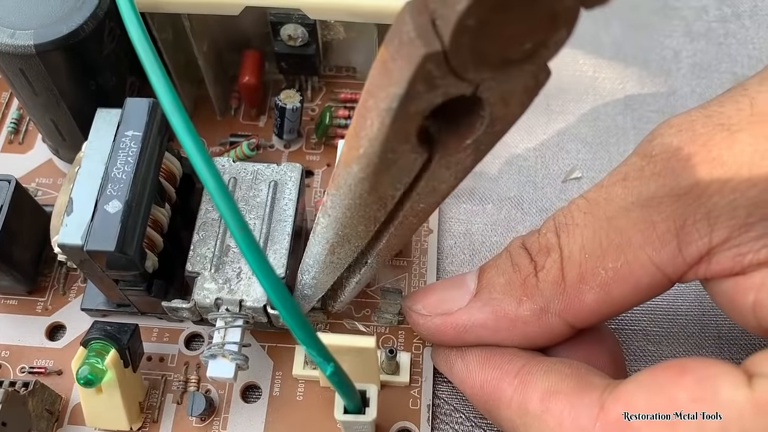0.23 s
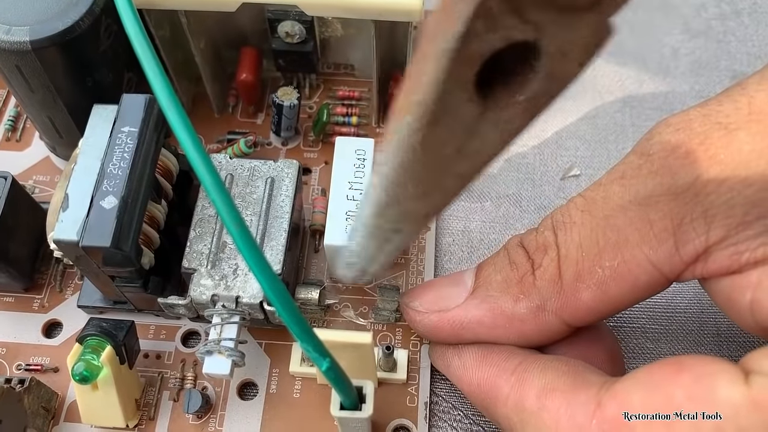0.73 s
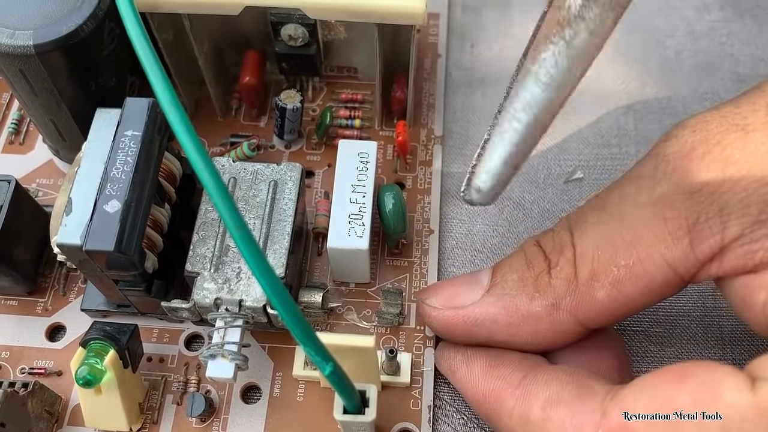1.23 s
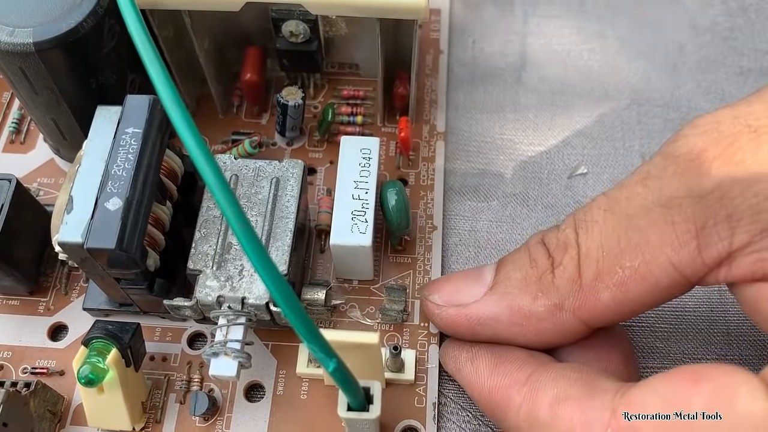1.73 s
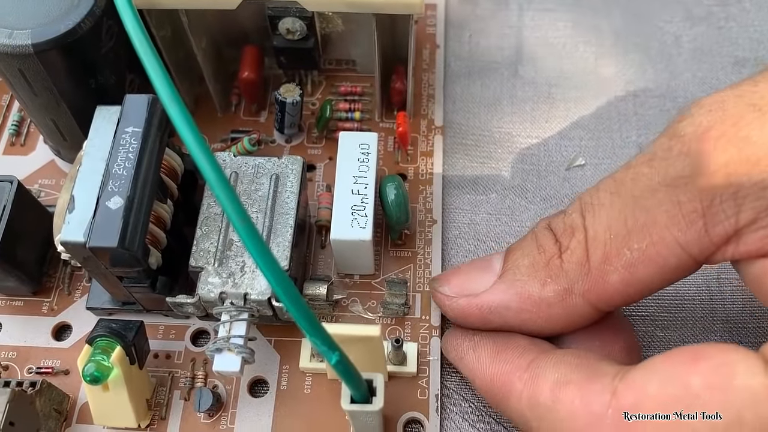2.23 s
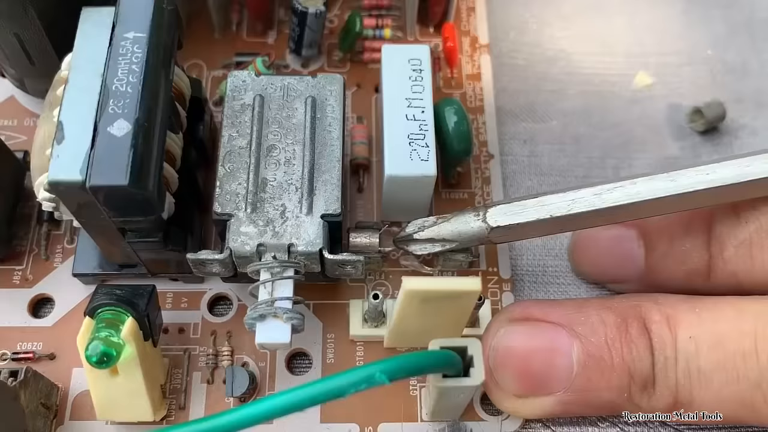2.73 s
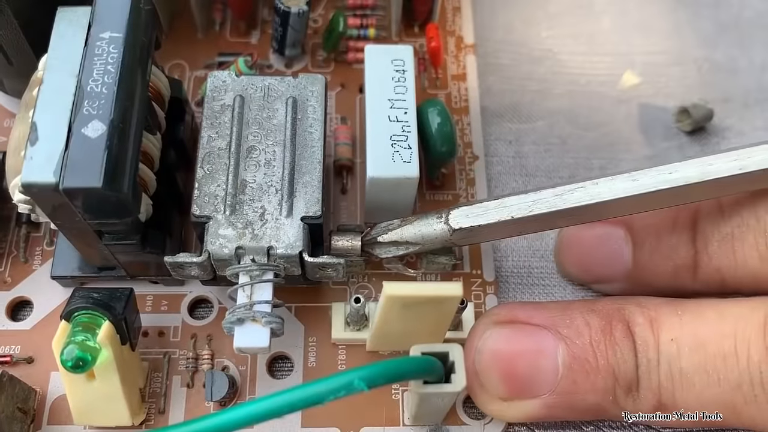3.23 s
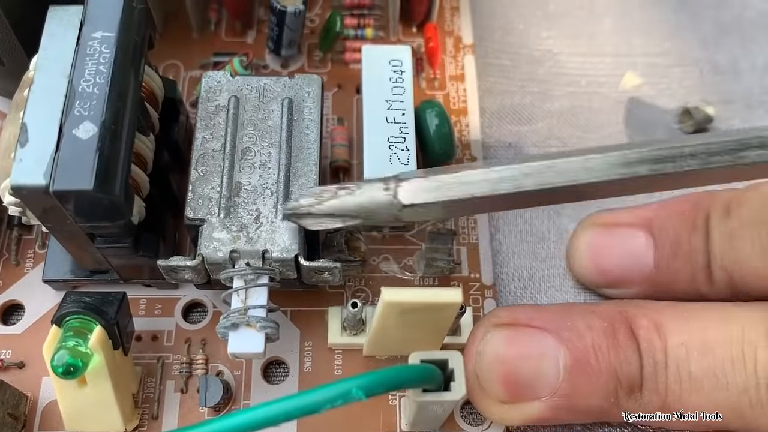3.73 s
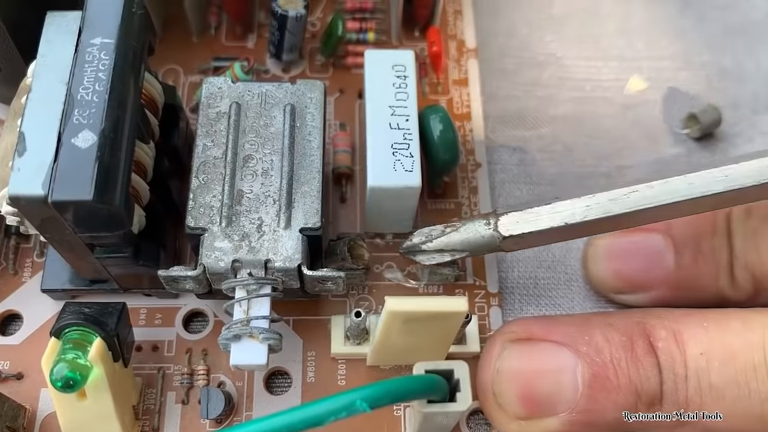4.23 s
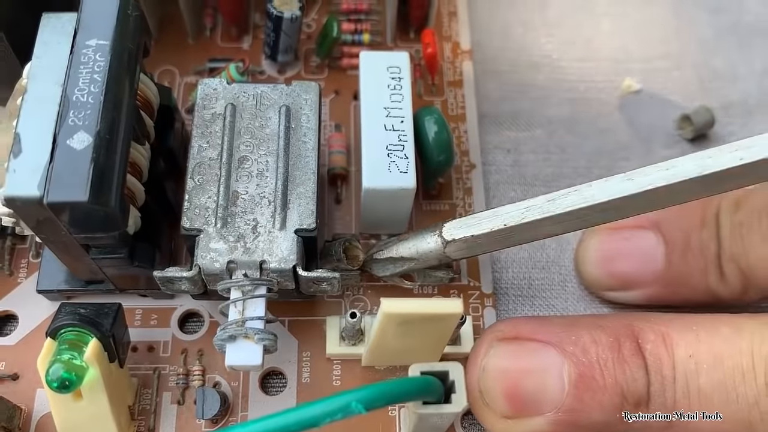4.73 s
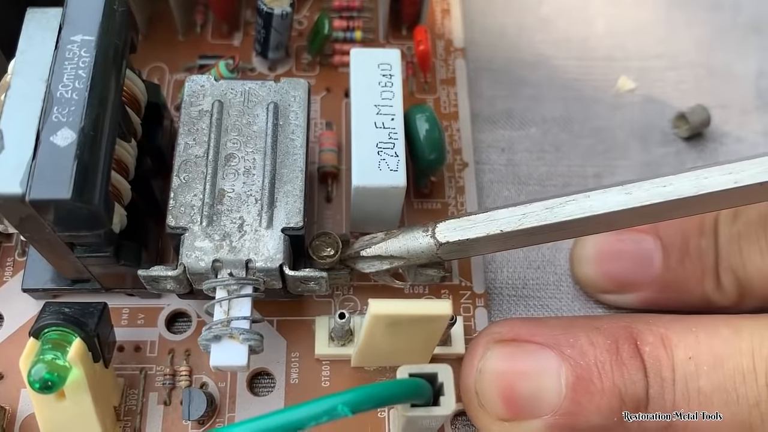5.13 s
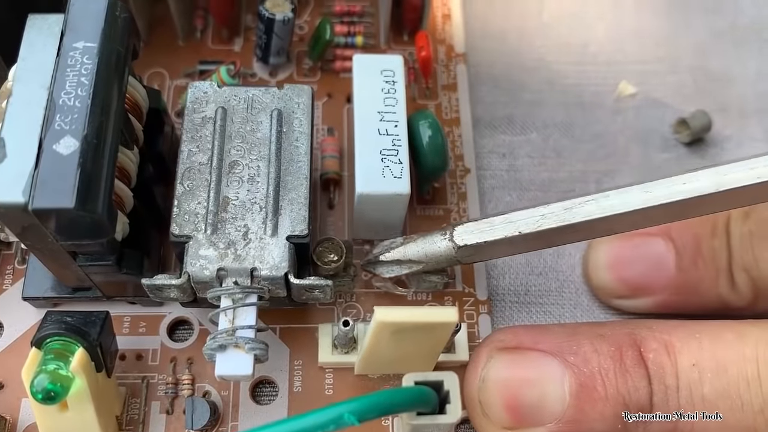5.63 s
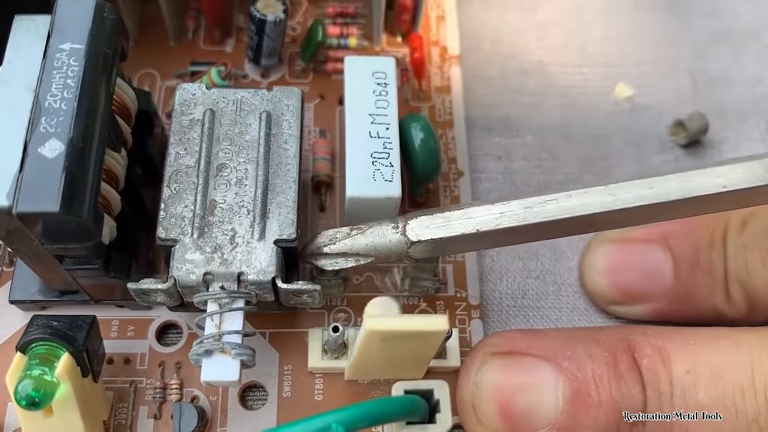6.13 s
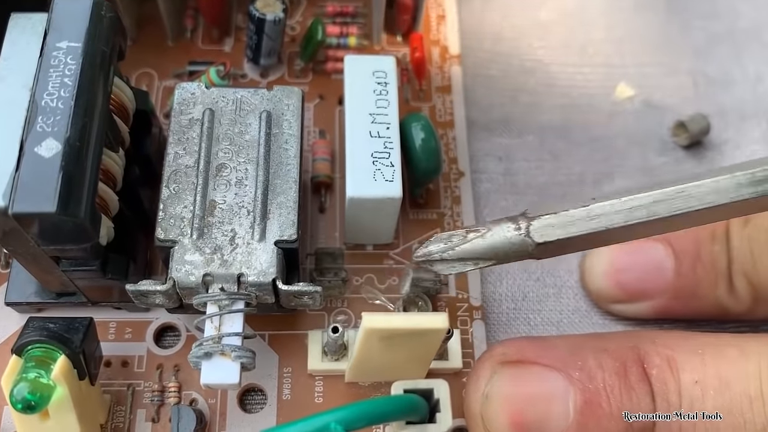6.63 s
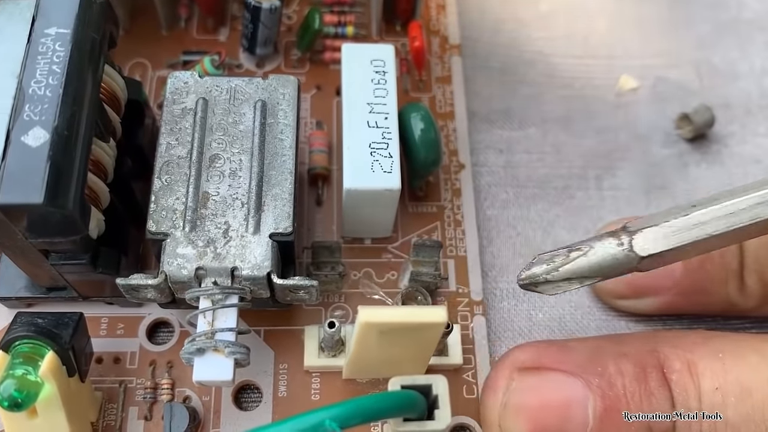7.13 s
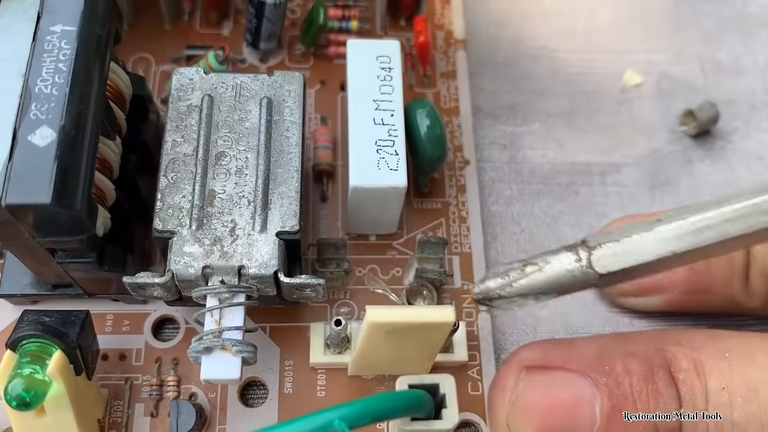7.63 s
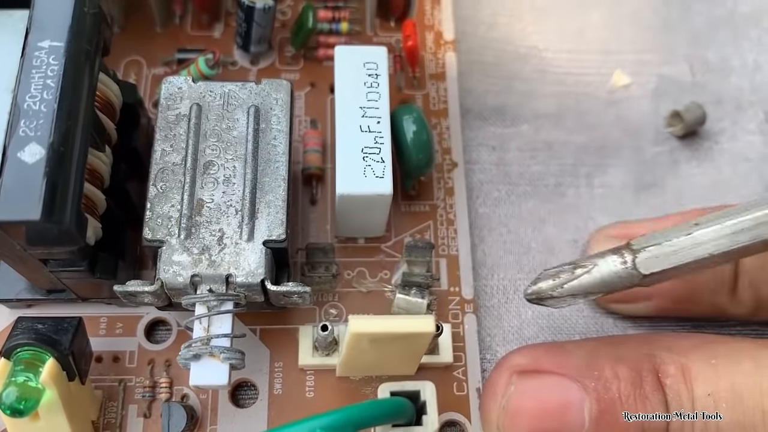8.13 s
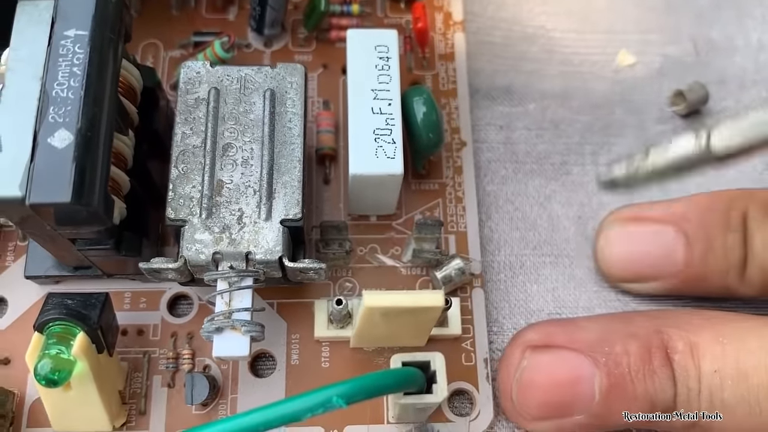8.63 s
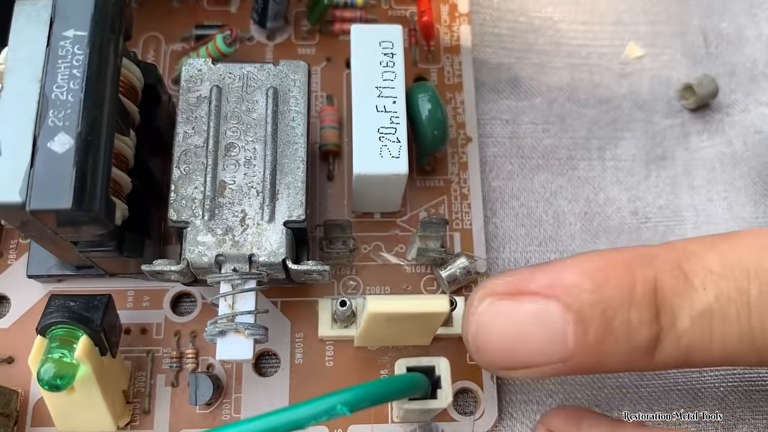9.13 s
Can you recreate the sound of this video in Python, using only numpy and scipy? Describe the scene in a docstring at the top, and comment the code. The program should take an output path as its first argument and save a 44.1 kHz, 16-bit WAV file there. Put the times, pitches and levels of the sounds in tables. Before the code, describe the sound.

Pliers and then a screwdriver click, tap and briefly scrape against metal parts on a circuit board, with dull thuds and soft wind buffeting.

```python
"""Sharp metallic taps and short scrapes: pliers, then a screwdriver, work at a metal clip on a circuit board.
Clumped noise slips excite decaying modes in taps and drags; stick-slip gives a screech and gliding squeaks.
The board thuds on the table as damped low modes, and the released steel shaft rings.
Low-passed noise and smooth pressure swings make a breeze that buffets the two microphones.
A faint noise-band hum, a far gliding engine, air noise and hiss lie behind."""
import sys
import numpy as np
from scipy import signal
from scipy.fft import rfft, irfft, next_fast_len
from scipy.io import wavfile
from scipy.ndimage import uniform_filter1d

SR = 44100
rng = np.random.default_rng(int(sys.argv[2]) if len(sys.argv) > 2 else 0)


def output_pcm(signal):
    """Save a mono or channel-first signal as 16-bit PCM at the path in sys.argv[1].

    Samples are clipped to [-1, 1] before scaling.
    """
    pcm = np.clip(np.atleast_2d(signal).T, -1, 1) * 32767
    wavfile.write(sys.argv[1], SR, np.round(pcm).astype(np.int16))


N = 413216
T = np.arange(N) / SR  # time [s]

# Metal touching the board, before the common gain of the work:
# (time [s], level [dB], treble [dB], strongest ring [Hz], contact length [s])
TAPS = [(0.167, -33, -7.5, 3060, 0.0044), (0.245, -36.5, 8, 2750, 0.00063),
        (0.3114, -32.5, 1.5, 1800, 0.0021), (0.328, -26, 11, 2700, 0.0039), (0.35, -33.5, 11, 4040, 0.0039),
        (0.397, -45.5, -1, 2230, 0.0014), (0.432, -23, 1.5, 2400, 0.00056), (0.479, -28, 4, 2320, 0.0037),
        (0.5043, -28.5, 6.5, 2990, 0.00052), (0.519, -39, 0, 2850, 0.0009),
        (0.5346, -43.5, 10.5, 3900, 0.0021), (0.6371, -20.5, 9, 2630, 0.00054),
        (0.6415, -24.5, 5, 1700, 0.00078), (0.6622, -23.5, 9, 1700, 0.0018), (0.6658, -27, 9, 1900, 0.001),
        (0.684, -29, -32, 2600, 0.0018), (0.6982, -14.5, -2, 2070, 0.0013),
        (0.849, -25, -48, 1880, 0.00046), (0.953, -40.5, -53, 2270, 0.0016),
        (0.969, -40, -32.5, 1880, 0.0021), (1.718, -43.5, -53, 6800, 0.00079),
        (2.579, -38, -30, 1500, 0.004), (3.131, -50, 4, 4060, 0.0015), (3.3138, -19.5, 1, 3560, 0.0027),
        (3.381, -44, -1, 2340, 0.007), (3.456, -17.5, 0, 2500, 0.0031), (3.465, -26, 8, 3800, 0.0009),
        (3.473, -25, 6, 2500, 0.0011), (3.492, -26.5, 0, 4160, 0.0013), (3.557, -22.5, 1, 4300, 0.0029),
        (3.601, -38.5, 3, 3900, 0.0024), (3.626, -35.5, 3, 4060, 0.0025), (3.6596, -19, -8, 4250, 0.0012),
        (3.68, -26.5, -3, 3890, 0.0036), (3.747, -11, 1, 4180, 0.0025), (3.95, -27.5, -12.5, 4050, 0.0019),
        (4.066, -32, -20, 2500, 0.00095), (4.2105, -33.5, -11, 2150, 0.0009),
        (4.813, -32, -16, 3910, 0.006), (4.922, -31.5, -7, 3500, 0.006), (4.94, -30, -9, 1740, 0.00098),
        (5.07, -38, -6.5, 2410, 0.0055), (5.121, -34, -8, 3000, 0.005), (5.326, -21, 4.5, 2840, 0.006),
        (5.369, -26, -14, 2960, 0.0022), (5.655, -37, -14, 4300, 0.0016), (5.862, -34.5, -27, 2500, 0.0024),
        (5.924, -27.5, -2.5, 4270, 0.0014), (6.1283, -17, 3, 3700, 0.0013), (6.1322, -11, 5, 6800, 0.002),
        (6.1384, -11.5, 4, 2220, 0.001), (6.201, -23.5, 0.5, 4300, 0.0028), (6.225, -30, -13, 3660, 0.0035),
        (6.2555, -27, 1, 3660, 0.0019), (6.261, -23.5, -3, 2200, 0.00073),
        (6.2785, -33, -0.5, 3550, 0.0016), (6.288, -29, -18, 2300, 0.0014),
        (7.017, -30.5, -7, 3120, 0.0014), (7.093, -29, -30, 3520, 0.003), (7.416, -18, -7.5, 3500, 0.0029),
        (7.563, -20.5, -11, 3640, 0.0056), (7.899, -21, -12, 2740, 0.0012),
        (7.912, -30.5, -1, 3010, 0.00097), (7.926, -32.5, 4, 3480, 0.0016),
        (7.971, -32, 5.5, 3950, 0.00073), (7.996, -12, -7, 4080, 0.00088), (8.4393, -17, -17, 2750, 0.0012),
        (8.466, -27.5, -10, 2180, 0.002)]
# Spectrum of a contact's body: (frequency [Hz], level [dB])
CRACK = [(700, -38.5), (1500, -17), (2200, 1), (3000, 3.5), (5000, -0.5), (7000, -9), (9000, -33)]
# Spectrum of the treble of taps and drags: (frequency [Hz], level [dB])
TREBLE = [(5000, -19.5), (7500, 0), (9500, -2), (12500, 1.5), (15300, -10), (16000, -11.5), (17000, -53)]
# Modes of the board and its parts: (frequency [Hz], level [dB], decay by 60 dB [s])
BOARD = [(1000, -13, .04), (1400, -3, .03), (1650, 0, .03), (2170, 1, .035), (2550, -3, .03),
         (2850, -2, .03), (3250, -2, .03), (3640, 0, .03), (4200, -2, .025), (4650, -6, .025),
         (5600, -7, .025), (7050, -6, .025), (9300, -11, .025)]
FOCUS = 0.4  # dB lost per octave from a tap's strongest ring, per dB of missing treble

# Drags of the tip, before the common gain of the work:
# (time of most pressure [s], build-up [s], let-go [s], level [dB], treble [dB], low rub [dB])
STROKES = [(0.279, 0.038, 0.025, -42.5, -2, -7), (0.439, 0.007, 0.054, -44, 5.5, -15),
           (0.682, .024, 0.028, -37.5, -29, -31), (0.715, .02, 0.0944, -50, -12, -8),
           (0.778, 0.019, 0.016, -52, -24, 4.5), (3.97, 0.03, 0.17, -57, -9, 11),
           (4.121, .1, 0.072, -58, -40, 10), (4.228, 0.014, 0.094, -54.5, -21, 0.5),
           (4.58, 0.074, 0.076, -61, -9.5, 7.5), (5.347, 0.016, 0.09, -45, -11.5, -3.5),
           (5.835, 0.079, 0.055, -59, -13.5, 3.5), (6.142, 0.0038, 0.041, -31, -18, -3.5),
           (6.29, 0.087, 0.1, -59, -4, -3.5), (7.05, 0.034, 0.11, -55.5, 1, -19.5),
           (7.424, 0.0047, 0.09, -54, -4, -22), (7.58, 0.071, 0.037, -48.5, -4, -27),
           (7.935, 0.044, 0.084, -44.5, -10.5, -16), (8.51, 0.019, 0.12, -45.5, -14, -22.5),
           (8.569, 0.059, 0.043, -42.5, -7, -21)]
# Spectrum of a drag's body: (frequency [Hz], level [dB])
RASP = [(700, -24.5), (1500, -1.5), (2200, 4), (3500, 4.5), (5000, -6.5), (7000, -10), (9000, -33)]
# Spectrum of the board groaning under a drag: (frequency [Hz], level [dB])
RUB = [(200, -26.5), (350, 17), (600, 5.5), (1000, -27), (2000, -48.5)]
BUILD_DB, LET_GO_DB = 18, 29  # fall of the gain below its top at the start and end of a swell [dB]
ROUND = 1.26  # exponent of a swell; above 1 its top is rounded

# The tip screeches as it slips off, before the common gain of the work:
# (loudest time [s], build-up [s], let-go [s], level [dB], slips per second [Hz])
SCREECH = (5.336, 0.0177, 0.0127, -22.5, 1409)
# Harmonics of the screech from the first upward: (level [dB])
OVERTONES_DB = [-6.5, 0.5, -1.5, -5.5, -12, -10]
# Squeaks of the sliding tip, before the common gain of the work:
# (loudest time [s], build-up [s], let-go [s], level [dB], first pitch [Hz], last pitch [Hz],
# width of each resonator [Hz])
SQUEAKS = [(5.356, 0.017, 0.026, -31, 2750, 2230, 380), (5.722, 0.022, 0.085, -52, 3940, 4040, 150),
           (5.834, 0.06, 0.02, -54, 3750, 4200, 350), (5.83, 0.13, 0.03, -61, 2190, 2170, 150),
           (5.835, .06, .02, -61, 3480, 3480, 150), (4.38, .06, .05, -64, 3080, 2950, 200),
           (7.048, 0.033, 0.05, -42, 3150, 4600, 600), (4.235, .02, .07, -56, 3050, 2950, 350),
           (4.622, .08, .03, -62, 1720, 1780, 90), (5.137, .006, .08, -61, 2370, 2370, 60),
           (4.125, .05, .04, -59, 1620, 1560, 150)]

# The tool springs free, before the common gain of the work:
# (time [s], level [dB], tilt towards the upper modes [dB per octave])
RINGS = [(3.75, -66, 0), (5.336, -26, 2), (6.257, -67.5, 17.5)]
# Modes of the steel shaft: (frequency [Hz], level [dB], decay by 60 dB [s])
SHAFT = [(1360, -20, .3), (3100, -17, .25), (4100, -21, .35), (9120, -36, .2)]

# Blows that shake the whole board:
# (time [s], peak level [dB], pitch [Hz], decay by 60 dB [s], upper modes [dB])
THUDS = [(0.268, -33.5, 207, 0.13, -14.5), (0.488, -34, 199, 0.14, -13.5), (0.327, -32, 221, 0.12, -10),
         (0.436, -31, 225, 0.15, -12.5), (0.66, -27.5, 184.5, 0.56, -25.5), (0.7, -23, 168.6, 0.083, -12.5),
         (0.709, -26, 246.3, 0.072, -21), (2.419, -22.5, 170, 0.23, -20.5),
         (2.579, -22.5, 164.6, 0.2, -12.5), (2.593, -20.5, 125, 0.28, -10), (2.625, -25, 92.3, 0.58, -17.5),
         (3.316, -23.5, 198, 0.094, -8.5), (3.461, -30, 331, 0.08, -8), (3.746, -24, 195, 0.16, -9.5),
         (3.95, -30.5, 151.5, 0.19, -6), (4.016, -27.5, 145, 0.075, -10), (4.065, -36.5, 354, 0.35, -14),
         (4.824, -32.5, 203, 0.11, -8), (4.924, -33, 197, 0.24, -1), (4.94, -24, 206.6, 0.082, -15.5),
         (5.128, -20, 202, 0.052, -21.5), (5.37, -25, 109, 0.12, -12), (6.133, -13, 123.4, 0.17, -18),
         (8.566, -23, 115.4, 0.059, -35)]
# Spectra of the puff through the table and of the upper modes: (frequency [Hz], level [dB])
PUFF = [(60, -11.0), (200, 2.0), (350, -8.0), (1000, -63.5)]
UPPER_MODES = [(200, -20), (400, 0), (600, 0), (800, -10), (1400, -21), (2200, -36), (9000, -90)]

# How the two microphones hear the work:
# (frequency [Hz], left over right [dB], likeness [0-1], lag of left behind right [samples])
NEAR = [(120, -.3, .97, -30), (260, 1.5, .97, -17), (470, 9, .9, -13), (660, 10, .6, 0), (1100, 5.5, .6, 7),
        (2400, 11.5, .5, 10), (4000, 8.5, .45, 10), (7500, 4, .55, 9.6), (8600, 0, .96, 9.6),
        (16000, 0, .97, 9.75)]
# How they hear the far air, with the same columns:
# (frequency [Hz], left over right [dB], likeness [0-1], lag of left behind right [samples])
FAR = [(60, 0, .93, 0), (240, -.5, .85, -3), (470, 3.5, .4, 5), (2400, 5, .45, 10), (7500, 5, .5, 9.6),
       (8600, 1, .9, 9.6), (16000, 0, .95, 9.75)]
# Absorption of the room's echoes: (frequency [Hz], level [dB])
ROOM = [(300, -4.0), (2500, -0.5), (5000, -0.5), (9000, -12.5)]

# Strength of the breeze, about which it wanders: (time [s], level [dB])
WIND = [(0, -33), (.1, -58), (.5, -45), (.62, -50.5), (.83, -38.5), (1.03, -59), (1.18, -44), (1.39, -43.5),
        (1.55, -50.5), (2.3, -53.5), (3.2, -55), (4.2, -53), (4.8, -55.5), (5.47, -49.5), (5.95, -34),
        (6.3, -39), (6.42, -52.5), (6.59, -30), (6.78, -41), (7.12, -38.5), (7.32, -44), (7.75, -42.5),
        (8.3, -37.5), (9.2, -38.5), (9.37, -47)]
# Spectra of the low buffeting and the upper rumble: (frequency [Hz], level [dB])
BUFFETING = [(10, -41), (30, -3.5), (50, -2.0), (90, -7.5), (130, -18.0), (400, -73.0), (1500, -130)]
RUMBLE = [(60, -23.5), (110, 1.0), (200, -2.0), (300, -18.0), (600, -39.5), (2500, -120)]
# Soft low bumps as gusts strike the microphones: (time [s], level [dB], pitch [Hz])
BUMPS = [(6.56, -24.5, 60.5), (6.615, -24, 140), (6.71, -30.5, 170), (6.993, -22.5, 125.4),
         (7.057, -26.5, 130), (7.12, -21, 62), (7.136, -29, 257), (7.213, -26.5, 100), (8.71, -31.5, 110),
         (9.09, -30.5, 120), (9.21, -28, 60)]
BUMP_TURNS = 0.44  # standard deviation of a bump's bell-shaped envelope [cycles]

# Strength of the hum: (time [s], level [dB])
HUM = [(0, -61), (2.8, -68), (2.9, -56), (5.7, -57), (6.5, -56.5), (6.8, -87), (7.4, -62), (7.6, -58.5),
       (9.37, -67)]
HUM_HZ, HUM_WIDTH_HZ = 245.8, 14.0
# A far engine swells and sinks in pitch: (loudest time [s], build-up [s], fading [s], level [dB],
# first pitch [Hz], last pitch [Hz], width of each resonator [Hz])
DRONE = [(0.931, 0.55, 0.67, -61.5, 500, 468.4, 70), (1.65, .25, 1.28, -61.5, 563, 416, 70)]
# Spectrum of the distant air noise: (frequency [Hz], level [dB])
AIR = [(90, -29), (150, -0.5), (320, -7.5), (670, -19), (1300, -25), (2500, -29), (6000, -52.5),
       (10000, -67), (11500, -95), (13000, -130)]
AIR_DB = -57.5
# Strength of the hiss: (time [s], level [dB])
HISS = [(0, -70), (.8, -69), (1, -75), (2.8, -73.5), (2.83, -64.5), (4.5, -66), (6.3, -66.5), (6.5, -70),
        (9.37, -76.5)]
# Spectrum of the hiss: (frequency [Hz], level [dB])
HISS_SPECTRUM = [(700, -6.5), (2000, -1.0), (4000, -2.5), (8000, -7.0),
                 (10000, -18.0), (11500, -18.5), (12800, -84.0)]
CEILING = .62  # amplitude that the soft limiter approaches
EDGE_HZ = 16700  # upper band limit [Hz]


def tap(row, spot):
    """Impact excitation: a chatter of tiny impacts rings the board and one part, as the struck spot allows."""
    s, level_db, treble_db, hz, length = row
    t = np.arange(6000) / SR
    u = t / max(length, 2e-4)
    # the contact builds up, then lets go
    chatter = slips(len(t), 4., clump=40) * (0.05 + u) * np.exp(-u)
    body = evened(colour(chatter, CRACK))
    part = signal.oaconvolve(body, ring([(hz, 0, 3.5 * length)], 0, t))[:len(t)]
    body += amp(-5.) * evened(part)
    board = signal.oaconvolve(chatter, touched(spot, t))[:len(t)]
    body += amp(-11) * evened(board)
    # a duller contact gathers round its strongest ring
    lost_db = FOCUS * np.clip(treble_db, -30, 0)
    body = colour(body, [(hz / 4, 2 * lost_db), (hz, 0), (hz * 4, 2 * lost_db)])
    # the treble comes from the first, sharpest impacts
    bright = colour(chatter * np.exp(-.9 * u), TREBLE)
    sound = body / abs(body).max() * amp(-6.0)
    sound += amp(treble_db - 0.5) * bright / abs(bright).max()
    return s, amp(level_db) * sound * fade(t)


def stroke(top_s, build_s, let_go_s, press_db, treble_db, rub_db):
    """Sliding friction: steel dragged over metal slips unevenly, rasps and drives the modes of the board."""
    s, gain = swell(top_s, build_s, let_go_s)
    drive = slips(len(gain), 3.3, clump=110)
    spot = rng.standard_normal((2, len(BOARD)))
    modes = signal.oaconvolve(drive, touched(spot, np.arange(3000) / SR))[:len(drive)]
    body = evened(evened(colour(drive, RASP)) + amp(-10.5) * evened(modes))
    treble = amp(treble_db) * evened(colour(drive, TREBLE))
    rub = amp(rub_db) * evened(colour(drive, RUB))
    return s, amp(press_db) * gain * (body + treble + rub) * signal.windows.tukey(len(drive), .1)


def screech(top_s, build_s, let_go_s, db, hz):
    """Regular stick-slip: a harmonic buzz, slightly unsteady in pitch and strength."""
    s, gain = swell(top_s, build_s, let_go_s)
    count = len(gain)
    pitch_wander = evened(uniform_filter1d(rng.standard_normal(count), size=150))
    turns = np.cumsum(hz * (1 + .025 * pitch_wander)) / SR
    buzz = sum(amp(level_db) * np.sin(2 * np.pi * k * turns)
               for k, level_db in enumerate(OVERTONES_DB, start=1))
    level_wander = evened(uniform_filter1d(rng.standard_normal(count), size=90))
    sound = evened(buzz * amp(3 * level_wander))
    return s, amp(db) * gain * sound * signal.windows.tukey(count, .2)


def whistle(row):
    """Narrow-band resonance: noise gathers round one gliding pitch, for squeaks and the far engine."""
    s, gain = swell(*row[:3])
    db, first_hz, last_hz, width_hz = row[3:]
    hz = np.linspace(first_hz, last_hz, len(gain))
    noise = rng.standard_normal(len(hz))
    tone = evened(resonate(resonate(noise, hz, width_hz), hz, width_hz))
    return s, amp(db) * gain * signal.windows.tukey(len(hz), .2) * tone


def spring(s, db, tilt_db):
    """Free vibration: the steel shaft rings on in its own modes after a quick release."""
    t = np.arange(12000) / SR
    octaves = np.log2(np.transpose(SHAFT)[0] / SHAFT[0][0])
    sound = ring(SHAFT, tilt_db * octaves, t)
    return s, amp(db) * sound * np.minimum(t / 0.0014, 1) * fade(t)


def thud(s, peak_db, hz, t60, upper_db):
    """Damped bending: low modes of the board ring with a dull puff through the table."""
    t = np.arange(12000) / SR
    low = ring([(hz, 0, t60), (.62 * hz, -5, t60), (1.5 * hz, -6, .8 * t60)], 0, t)
    puff = evened(colour(rng.standard_normal(len(t)), PUFF))
    upper = evened(colour(rng.standard_normal(len(t)), UPPER_MODES))
    sound = low + .6 * puff * amp(-60 * t / t60)
    sound += amp(upper_db + 6 - 85 * t / t60) * upper  # the upper modes die sooner
    sound *= np.minimum(t / 0.0013, 1) * fade(t)
    return s, amp(peak_db) * sound / abs(sound).max()


def wind():
    """Turbulent pressure: lumpy low buffeting and a rougher rumble, partly separate at each port."""
    gust = amp(np.interp(T, *np.transpose(WIND)) + 2. * slow(10.0))
    upper_gain = amp(-14.5 + 5.5 * slow(13.0))
    flows = []
    for _ in range(3):  # one shared, then one for each port
        noise = rng.standard_normal(N)
        low = evened(colour(noise, BUFFETING))
        upper = evened(colour(noise, RUMBLE))
        flows.append(gust * (low + upper_gain * upper))
    return flows[0] + amp(-10.5) * np.array(flows[1:])


def bumps():
    """Transient gust pressure: each bump is a smooth swing under a bell-shaped envelope."""
    total = np.zeros(N)
    for s, db, hz in BUMPS:
        turns = hz * (T - s)
        total += amp(db) * np.sin(2 * np.pi * turns) * np.exp(-.5 * (turns / BUMP_TURNS) ** 2)
    return total


def tones():
    """Narrow-band noise: a wavering hum and a far engine gliding down."""
    noise = rng.standard_normal(N)
    narrow = resonate(resonate(noise, HUM_HZ, HUM_WIDTH_HZ), HUM_HZ, HUM_WIDTH_HZ)
    hum = amp(np.interp(T, *np.transpose(HUM))) * evened(narrow)
    for row in DRONE:
        add(hum, *whistle(row))
    return hum


def background():
    """Broadband noise shaped by spectrum: distant air and a hiss of changing level."""
    air = amp(AIR_DB) * evened(colour(rng.standard_normal(N), AIR))
    hiss = evened(colour(rng.standard_normal(N), HISS_SPECTRUM))
    return air + amp(np.interp(T, *np.transpose(HISS))) * hiss


def echoes(t60, count):
    """Exponential decay of reverberation: sparse reflections of random sign, energy 1."""
    signs = rng.choice([-1., 1.], count)
    present = rng.random(count) < .08
    taps = signs * present * amp(-60 * np.arange(count) / SR / t60)
    return taps / np.linalg.norm(taps)


def ports(x, other, table):
    """Interaural-style coherence: level, likeness and delay between two microphones depend on frequency."""
    size = next_fast_len(N)
    hz = np.fft.rfftfreq(size, 1 / SR)
    left_db, same, lag = (read(np.array(table)[:, [0, k]], hz) for k in (1, 2, 3))
    right = same * rfft(x, size) * np.exp(2j * np.pi * hz * lag / SR)
    right += np.sqrt(1 - same ** 2) * rfft(other, size)
    return np.array([x, irfft(right * amp(-left_db), size)[:N]])


def slips(count, grip_db, clump):
    """Irregular stick-slip: dense uneven slips come in clumps as the tip grips and lets go."""
    grip = amp(grip_db * evened(uniform_filter1d(rng.standard_normal(count), size=clump)))
    return rng.standard_normal(count) * amp(2.4 * rng.standard_normal(count)) * grip


def touched(spot, t):
    """Modal coupling: the spot touched, with fingers and tool, shifts the board's pitches and strengths."""
    modes = np.array(BOARD, float)
    modes[:, 0] *= 1 + .015 * spot[0]
    return ring(modes, 2.2 * spot[1], t)


def ring(modes, strengths_db, t):
    """Modal superposition: dying sines, each struck with its own strength."""
    hz, db, t60 = np.transpose(modes)[:, :, None]
    level_db = (db[:, 0] + strengths_db)[:, None] - 60 * t / t60
    return (amp(level_db) * np.sin(2 * np.pi * hz * t)).sum(0)


def swell(top_s, build_s, let_go_s):
    """Envelope of a gesture: start time and gain of one build-up and let-go."""
    t = np.arange(-build_s, let_go_s, 1 / SR)
    place = np.where(t < 0, t / build_s, t / let_go_s)  # -1 start, 0 top, 1 end
    fall_db = np.where(t < 0, BUILD_DB, LET_GO_DB) * abs(place) ** ROUND
    return max(top_s - build_s, 0), amp(-fall_db)


def resonate(x, hz, width):
    """Heterodyne resonance: shifts the pitch down to zero, smooths, and shifts back."""
    turn = np.exp(2j * np.pi * np.cumsum(hz * np.ones(len(x))) / SR)
    r = np.exp(-np.pi * width / SR)
    return 2 * (turn * signal.lfilter([1 - r], [1, -r], x / turn)).real


def colour(x, points):
    """Linear filtering: weights the spectrum by a curve in dB."""
    size = next_fast_len(len(x) + 4096)
    gain = amp(read(points, np.fft.rfftfreq(size, 1 / SR)))
    return irfft(rfft(x, size) * gain, size)[:len(x)]


def slow(rate_hz):
    """Low-passed random process: a slow wander of rms 1."""
    return evened(colour(rng.standard_normal(N), [(rate_hz, 0), (8 * rate_hz, -120)]))


def read(points, hz):
    """Interpolation of a curve along logarithmic frequency."""
    f, value = np.transpose(points)
    return np.interp(np.log(hz + 1), np.log(f + 1), value)


def amp(db):
    """Decibel law: level to amplitude."""
    return 10 ** (np.asarray(db) / 20)


def evened(x):
    """Power normalisation: scales to rms 1."""
    return x / np.sqrt(np.mean(x ** 2) + 1e-20)


def fade(t):
    """Quarter-cosine taper from one to zero."""
    return np.cos(np.pi / 2 * t / t[-1])


def add(mix, s, sound):
    """Superposition: adds a sound to the mix from time s [s]."""
    part = mix[round(s * SR):][:len(sound)]
    part += sound[:len(part)]


def scene():
    """Superposition of the work, its reflections, the far air and the breeze at two microphones."""
    work = np.zeros(N)
    spots = rng.standard_normal((len(TAPS), 2, len(BOARD)))
    for row, spot in zip(TAPS, spots):
        add(work, *tap(row, spot))
    for row in RINGS:
        add(work, *spring(*row))
    for row in STROKES:
        add(work, *stroke(*row))
    for row in SQUEAKS:
        add(work, *whistle(row))
    add(work, *screech(*SCREECH))
    work *= amp(3.5)  # common gain of the work, without the thuds
    for row in THUDS:
        add(work, *thud(*row))
    room = colour(echoes(0.13, count=9000), ROOM)  # walls swallow the treble
    work += amp(-9.0) * signal.oaconvolve(work, room)[:N]
    # scattered by the parts standing on the board
    scattered = signal.oaconvolve(work, echoes(.03, count=1400))[:N]
    near = ports(work, scattered, NEAR)
    far = ports(background() + tones(), background(), FAR)
    return near + far + wind() + bumps()


def record(dry):
    """Saturation and band limiting: the hardest blows meet a soft ceiling, then a low-pass filter."""
    held = CEILING * np.tanh(dry / CEILING)
    low_pass = signal.firwin(511, EDGE_HZ, window=("kaiser", 9), fs=SR)
    return signal.oaconvolve(held, low_pass[None], "same")


dry = scene()
out = record(dry)
output_pcm(out)
```